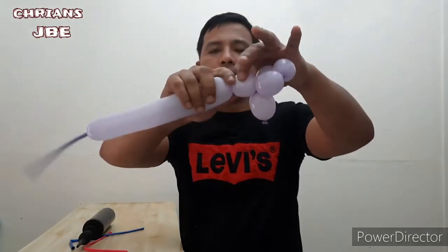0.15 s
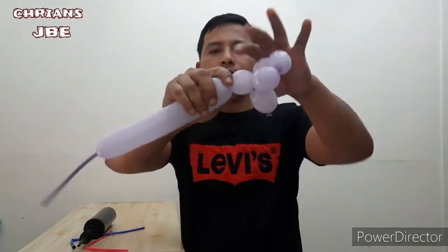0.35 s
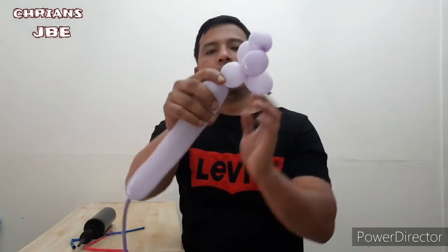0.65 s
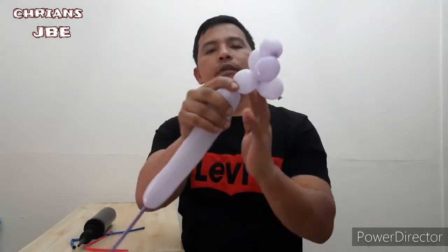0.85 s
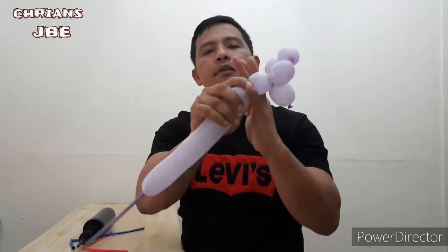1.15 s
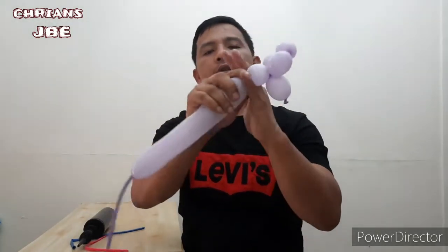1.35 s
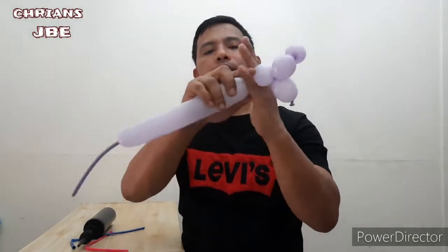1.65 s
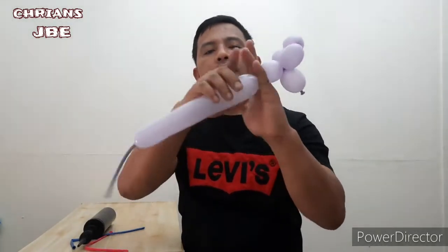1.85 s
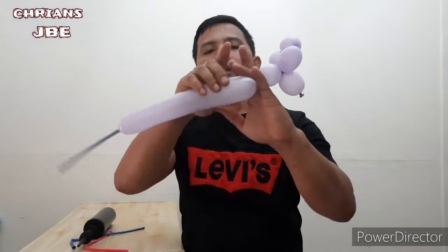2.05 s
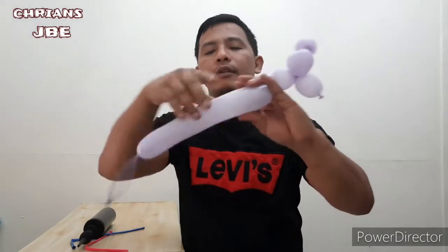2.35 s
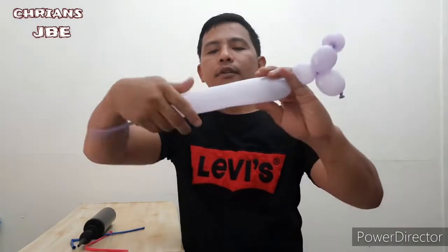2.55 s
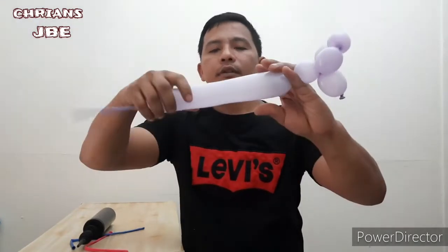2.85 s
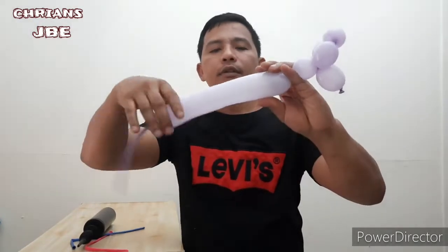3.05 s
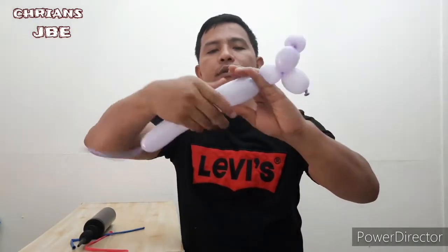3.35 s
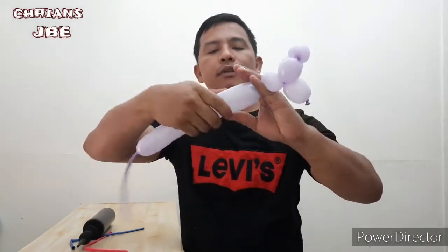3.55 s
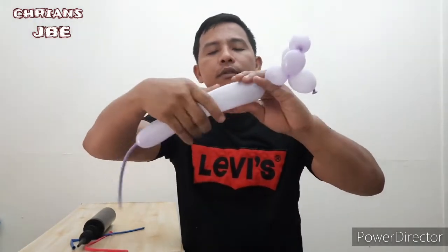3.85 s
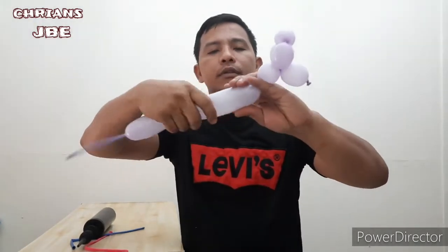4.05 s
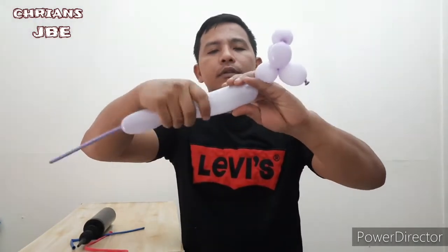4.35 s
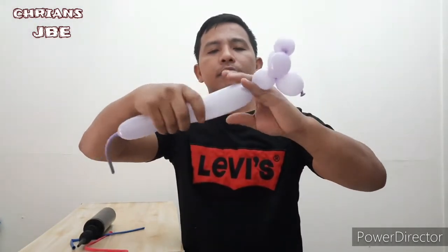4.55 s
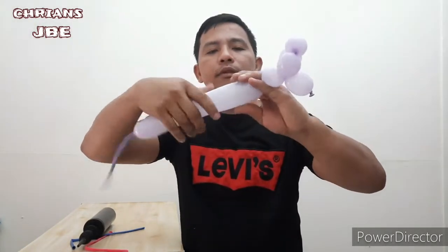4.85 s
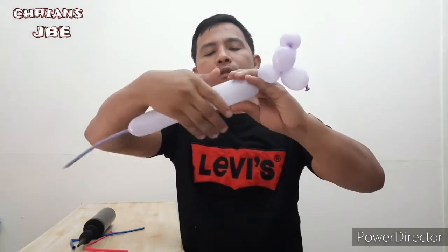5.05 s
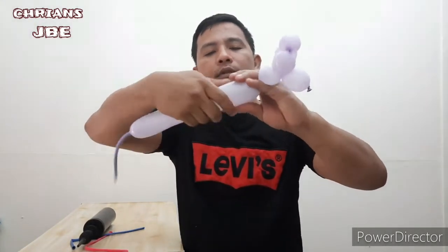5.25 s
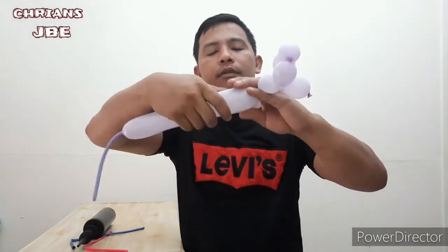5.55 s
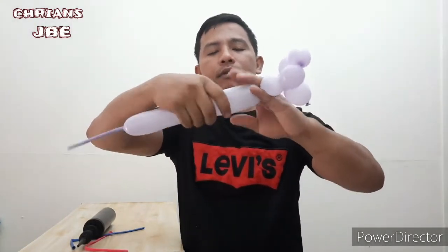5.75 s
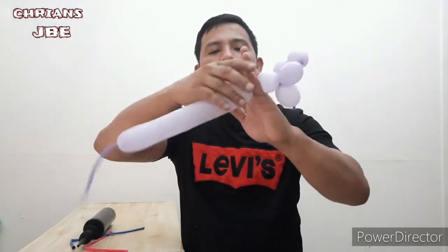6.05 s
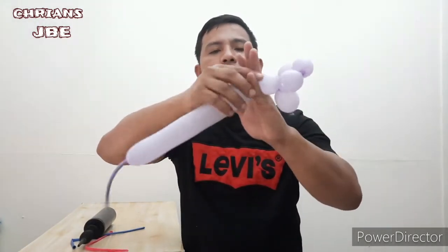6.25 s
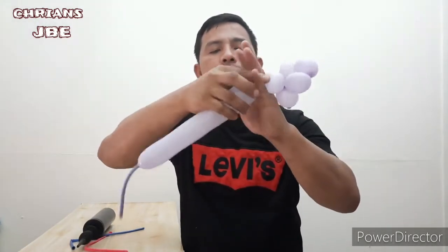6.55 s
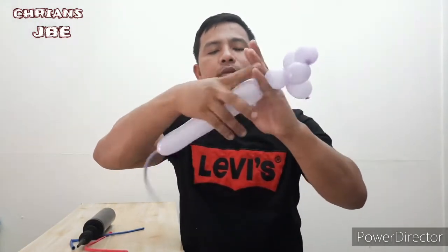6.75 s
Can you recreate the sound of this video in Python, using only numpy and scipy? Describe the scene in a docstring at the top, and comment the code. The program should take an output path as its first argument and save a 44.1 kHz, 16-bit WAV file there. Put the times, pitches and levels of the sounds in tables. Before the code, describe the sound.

A long latex balloon is squeezed and twisted by hand in a small bare room with short, hard echoes, over a constant faint rumble and hiss. A dry snap with a tiny creak comes at 0.1 s and a duller, more distant one at 0.4. After near-quiet, faint rubbing starts about 1.2. From 1.65 to 2.5 the action is dense: hard snaps at 1.7-1.9, rough creaks, a loud croak near 2.36, then a thin high squeak at 2.5. Low, coarse creaks fill 2.8-3.1, weaker ones 3.4-3.6. A firm snap and creak at 3.8 leads to strong short squeaks at 3.9-4.06. Softer creaks run 4.5-4.9; a brief squeak at 5.2 and a sharp pop at 5.34 follow, then creaks 5.6-5.95. Faint slides and a tiny high squeak pass after 6, before a loud snap, creak and squawk at 6.7, fading out.

```python
"""A long latex balloon is squeezed and twisted by two hands in a small bare room.
The latex sticks and slips: lone slips are snaps, uneven trains of slips creak, even ones squeak.
Between them come faint, fast slides. Each grip leaves a different patch of skin free to ring.
Every sound gets its own hard-walled echoes, over a faint steady rumble and hiss."""
import sys
import numpy as np
from scipy import signal
from scipy.fft import rfft, irfft, next_fast_len
from scipy.io import wavfile

SR = 44100
rng = np.random.default_rng(int(sys.argv[2]) if len(sys.argv) > 2 else 0)


def file_out(sig):
    """Save sig as 16-bit WAV at sys.argv[1]."""
    # one column per channel
    cols = np.atleast_2d(sig).T
    # limit, then scale
    lim = np.clip(cols, -1, 1)
    pcm = np.round(lim * 32767).astype(np.int16)
    wavfile.write(sys.argv[1], SR, pcm)


N = 303849  # samples

# In the four event tables, level_db is set before the split into direct sound and echoes.
# Lone releases of the skin, level taken over 10 ms; room_db leans towards the echoes:
# start_s, level_db, low_edge_hz, ring_hz, high_edge_hz, room_db
SNAP_EVENTS = [ (0.1036, -28.5, 1500, 2680, 5600, 6), (.385, -30.5, 700, 2200, 2180, 15.5),
               (1.501, -41.5, 1160, 1860, 2920, 4.5), (1.650, -30, 1110, 1250, 2760, 9),
               (1.7212, -18.5, 656, 2900, 3530, -0.5), (1.761, -16, 590, 850, 3240, 5),
               (1.892, -17.5, 594, 760, 2780, 6.5), (2.1626, -27, 1180, 1790, 3380, 0.5),
               (2.324, -32, 584, 2650, 3700, 8), (2.348, -25, 595, 1750, 3780, 7),
               (2.361, -17.5, 510, 1330, 2250, 5), (3.027, -22.5, 437, 1000, 1990, 9),
               (3.194, -37.5, 635, 2180, 1874, -6.5), (3.3, -49, 570, 760, 2000, 0),
               (3.379, -44, 346, 1990, 3800, 14), (3.795, -36, 546, 1000, 2250, 2),
               (3.832, -23, 1040, 1100, 2700, 5), (4.343, -47, 2080, 3400, 3170, 4.5),
               (4.5217, -28, 477, 804, 2520, -2), (4.761, -35, 354, 1410, 3470, 5),
               (4.848, -27, 258, 970, 3100, 6), (5.152, -45.5, 596, 803, 2330, -10),
               (5.233, -34, 400, 1700, 3000, 4), (5.342, -16.5, 716, 880, 1250, 0),
               (5.6392, -24, 404, 554, 1890, 0), (6.307, -50.5, 400, 1470, 3300, 4),
               (6.676, -22, 615, 774, 3400, 8.5)]
# Firm, uneven drags; crest is the place of greatest force (0-1), slip_rate_hz the nominal starting rate:
# start_s, length_s, crest, slip_rate_hz, level_db, low_edge_hz, ring_hz, high_edge_hz
CREAK_EVENTS = [ (0.111, 0.028, 0, 571, -26, 560, 2370, 3170),
                (1.272, .14, .58, 500.6, -42, 1150, 1490, 1940),
                (1.892, 0.077, 0.4, 265.3, -23.5, 326, 312, 2400),
                (1.962, 0.13, 0.1, 455, -32, 198, 434, 2390),
                (2.061, 0.038, 0.27, 519, -26.5, 248, 2040, 3740),
                (2.178, 0.009, 0, 565, -21.5, 358, 1980, 3640),
                (2.355, .052, 0.46, 304.6, -14, 290, 1370, 3000),
                (2.47, 0.057, 0.05, 609, -28.5, 246, 1960, 3350),
                (2.788, 0.081, 0.5, 185.9, -27.5, 270, 705, 2480),
                (2.842, 0.085, 0.32, 213.6, -25.5, 400, 800, 2830),
                (2.935, 0.16, 0, 784, -34.5, 295, 730, 2640),
                (3.032, 0.06, 0.38, 152.5, -20, 268, 820, 2980),
                (3.373, 0.059, 0.17, 404, -43.5, 330, 467, 2700),
                (3.452, 0.087, 0, 207.8, -33.5, 353, 503, 2130),
                (3.539, 0.066, 0.1, 501.6, -37, 454, 477, 1830),
                (3.832, 0.066, 0.36, 364.3, -22, 298, 910, 2540),
                (3.953, .044, 0.3, 286.8, -17, 242, 270, 2650),
                (4.512, 0.046, 1, 454.6, -30, 380, 458, 2570),
                (4.574, 0.058, 0.56, 414, -38.5, 216, 373, 2320),
                (4.672, 0.093, 1, 383, -44.5, 295, 368, 2070),
                (4.762, 0.055, 0.56, 271, -40.5, 200, 253, 3440),
                (4.845, 0.097, 0, 261.5, -28.5, 238, 830, 3560), (5.15, .1, 0.54, 265, -31, 226, 256, 2060),
                (5.599, 0.066, 0.3, 286, -30.5, 274, 1980, 1550),
                (5.74, 0.15, 0.17, 360.3, -30, 340, 714, 2160),
                (5.897, 0.068, 0.63, 291.7, -32, 232, 925, 4440),
                (6.677, 0.05, 0.9, 380.7, -17.5, 346, 463, 2830),
                (6.795, 0.086, 0.65, 343, -39, 260, 1400, 1930)]
# Light touches that ring the skin at the nominal slip rate:
# start_s, length_s, slip_rate_hz, level_db, high_edge_hz
SLIDE_EVENTS = [ (1.185, 0.13, 1244, -54.5, 6130), (1.509, 0.4, 1690, -53, 3800),
                (2.745, 0.11, 524, -45, 2920), (3.759, 0.07, 977, -50, 2960),
                (4.226, 0.089, 862.5, -46.5, 1190), (5.419, 0.048, 812, -42.5, 2310),
                (6.04, .2, 1010, -61, 6000), (6.307, 0.22, 849, -62, 3470),
                (6.458, 0.14, 1135, -55.5, 2880), (6.618, 0.025, 1127, -38.5, 1720)]
# Even, gliding slips, pitches before the arch and scatter:
# start_s, length_s, crest (0-1), start_pitch_hz, end_pitch_hz, level_db, ring_hz, high_edge_hz
SQUEAK_EVENTS = [ (2.391, 0.05, 0.26, 364, 336.6, -21, 2400, 3700),
                 (2.465, 0.013, 0.76, 1714, 1800, -17.5, 1870, 3270),
                 (2.491, 0.026, 0, 1643, 1736, -18, 1770, 4900),
                 (2.514, .038, .4, 1722, 1675, -44, 3400, 4330),
                 (2.791, 0.029, 0.2, 177.3, 165, -30.5, 194, 604),
                 (3.905, .051, 0.88, 392, 377.3, -16, 2090, 2370),
                 (4.057, 0.0126, 0, 387, 373, -14, 750, 1040),
                 (5.023, .16, 0.07, 241.7, 254, -56, 247, 490),
                 (5.233, 0.016, 0, 375.4, 377, -22.5, 1760, 2000),
                 (6.161, 0.0514, 0.07, 1485, 1590, -53.5, 1560, 3330),
                 (6.729, 0.043, 0.01, 334, 334.5, -18, 1050, 3700)]
# Resonances of the air-filled tube: centre_hz, width_hz, added gain (ratio)
TUBE_RESONANCES = [(229, 110, 0.9), (820, 120, 0.36)]
# Decay of the room's tail: frequency_hz, t60_s
ROOM_DECAY = [(200, 0.43), (530, 0.31), (1400, 0.31), (3700, 0.32), (10000, 0.32)]
# Spectral shape of the background, before its overall level is set: frequency_hz, relative density_db
BACKGROUND_SHAPE = [(25, -25), (60, -13), (100, -9), (135, -23.5), (210, -6.5), (330, -15), (450, -24),
                    (1500, -33.5), (4000, -44), (8200, -41.5), (9500, -49.5), (15500, -47.5)]
# Microphone colour on the balloon sounds: frequency_hz, gain_db
MIC_COLOUR = [(200, 3.5), (4000, 3.5), (6300, -1.5), (8200, 3.5), (9300, -8), (14000, -9), (16000, -24.5)]
# Stereo balance: frequency_hz, left_minus_right_db
STEREO_BALANCE = [(100, 7), (300, 3), (1500, 4), (4500, 4), (8200, 9.5), (9800, -4.5), (13000, -0.5)]

BACKGROUND_DB = -64  # before the stereo balance
TOP_HZ = 15900  # top of the passband
BINS = np.maximum(np.fft.rfftfreq(4096, 1 / SR), 1)  # Hz
# Every patch of skin: the higher its high edge, the more hiss lies above it
HISS_DB, HISS_AT_HZ, HISS_DB_PER_OCTAVE = -12, 2553, 16.5
# Reference slip rate for roughness in creaks and squeaks
ROUGH_AT_HZ = 334
# Creaks: the rate sags by this share; faster slips and brighter patches are less even
CREAK_SAG, CREAK_ROUGH, RATE_POWER, BRIGHT_POWER = 0.06, 0.26, 0.3, 0.6
# Slides: uneven slips, force crest (0-1), low edge as a share of the slip rate
SLIDE_ROUGH, SLIDE_CREST, SLIDE_LOW_SHARE = 0.26, 0.54, 0.85
# Squeaks: almost even slips; the skin sounds from just under the starting pitch upwards
SQUEAK_ROUGH, PITCH_POWER, SQUEAK_LOW_SHARE = 0.016, 0.7, 0.98


def undb(db):
    """Decibels to gain."""
    return 10 ** (np.asarray(db) / 20)


def curve(points, hz):
    """Read (Hz, value) points on a log-frequency axis."""
    f, value = np.transpose(points)
    return np.interp(np.log(np.maximum(hz, 1)), np.log(f), value)


def colour(x, gain):
    """Filter by a gain that is a function of frequency."""
    length = x.shape[-1]
    size = next_fast_len(length)
    spectrum = rfft(x, size) * gain(np.fft.rfftfreq(size, 1 / SR))
    return irfft(spectrum, size)[..., :length]


def causal(gain):
    """Minimum-phase impulse response of a gain given on BINS."""
    cepstrum = irfft(np.log(gain + 1e-6))
    half = len(cepstrum) // 2
    # fold the cepstrum forward in time, so the energy comes as early as it can
    cepstrum[1:half] *= 2
    cepstrum[half + 1:] = 0
    return irfft(np.exp(rfft(cepstrum)))[:half]


def unit(x):
    """Scale to a mean energy of one per channel."""
    return x / np.sqrt(np.mean(np.sum(x ** 2, axis=-1)))


def diffuse(size, apart_hz):
    """Noise at two close microphones: alike in the bass, unrelated in the treble."""
    def alike(f):
        return 0.95 / (1 + (f / apart_hz) ** 2)

    mid, side = rng.standard_normal((2, size))
    mid = colour(mid, lambda f: np.sqrt(1 + alike(f)))
    side = colour(side, lambda f: np.sqrt(1 - alike(f)))
    return np.array([mid + side, mid - side])


def add(track, s, sound):
    """Mix a stereo sound in at time s."""
    i = max(int(s * SR), 0)
    track[:, i:i + sound.shape[1]] += sound[:, :max(N - i, 0)]


def background(apart_hz=110):
    """Faint steady rumble and hiss of the room, as shaped noise."""
    noise = colour(diffuse(N, apart_hz), lambda f: undb(curve(BACKGROUND_SHAPE, f)))
    return undb(BACKGROUND_DB) * noise / noise.std()


def grip(low_hz, ring_hz, high_hz):
    """The patch of skin that a grip leaves free: a taut, bright patch also hisses more."""
    hiss_db = HISS_DB + HISS_DB_PER_OCTAVE * np.log2(high_hz / HISS_AT_HZ)
    return low_hz, ring_hz, high_hz, hiss_db


def skin(low_hz, ring_hz, high_hz, hiss_db, ring_gain=1.11, ring_q=9.7, bump_db=-40.5):
    """Response of the free latex: a band with one resonance, hiss above it, a dull bump below."""
    low_cut = 1 / (1 + (low_hz / BINS) ** 6)
    high_cut = 1 / (1 + (BINS / high_hz) ** 6)
    bump = undb(bump_db + curve([(30, -16.5), (110, 8.5), (400, -6.5)], BINS))
    band = np.sqrt((low_cut + bump ** 2) * (high_cut + undb(hiss_db) ** 2))
    ring = 1 + ring_gain / (1 + (ring_q * np.log(BINS / ring_hz)) ** 2)
    tube = 1 + sum(gain / (1 + (2 * (BINS - hz) / width) ** 2) for hz, width, gain in TUBE_RESONANCES)
    return causal(band * ring * tube * undb(curve(MIC_COLOUR, BINS)))


def snaps():
    """Single releases of the stretched skin; those facing away reach the walls more than the microphone."""
    for s, db, *patch, room_db in SNAP_EVENTS:
        ringing = unit(skin(*grip(*patch)))
        yield s, undb(db) * np.sqrt(SR / 100) * ringing, room_db  # energy spread over 10 ms


def slips(length, start_hz, end_hz, rough, arch=0.045, jitter=0.55, scatter_db=26.5, rasp=0.3):
    """Stick-slip pulses; the rate arches with finger speed, roughness scatters their spacing and size."""
    timing, strength = rng.standard_normal((2, 512))
    noise = rng.standard_normal(SR // 2)
    u = np.linspace(0, 1, int(length * SR))
    hz = (start_hz + (end_hz - start_hz) * u) * (1 + arch * np.sin(np.pi * u))
    cycles = np.cumsum(hz) / SR
    holds = np.exp(jitter * rough * timing)
    release = np.cumsum(holds) - holds[0]
    release = release[release < cycles[-1]]
    size = undb(scatter_db * rough * strength[:len(release)].clip(-2, 2))
    # place the pulses on a finer time grid, then bring them down to SR
    fine = 4
    place = np.interp(release, cycles, np.arange(len(u)) * fine).astype(int)
    impulses = np.bincount(place, size, len(u) * fine)
    pulses = fine * signal.resample_poly(impulses, 1, fine)
    # the sliding skin rasps for a moment (5 ms decay) after each release
    sliding = signal.lfilter([1], [1, -np.exp(-1 / (0.005 * SR))], pulses)
    return unit(pulses) + rasp * np.sqrt(rough) * unit(sliding * noise[:len(u)])


def disperse(x, spread_s=0.00309, knee_hz=2500):
    """Ripples cross the skin faster in the treble, which smears each pulse."""
    return colour(x, lambda f: np.exp(-2j * np.pi * spread_s * knee_hz * np.log1p(f / knee_hz)))


def stroke(train, crest, db, patch, touch_force=0.31, grip_force=0.72, last_force=0.28,
           flex_db=-31.0, flex_hz=125):
    """A finger takes hold, presses and eases off; slips sound the skin while the tube flexes."""
    force = np.interp(np.linspace(0, 1, len(train)), [0, crest / 4, crest, 1],
                      [touch_force, grip_force, 1, last_force])
    sound = unit(disperse(signal.fftconvolve(train * force, skin(*patch))))
    # the flexing tube is low noise that follows the force
    push = rng.standard_normal(SR // 2)[:len(force)] * force
    push = np.pad(push, (0, len(sound) - len(force)))
    flex_band = signal.butter(2, [flex_hz / 2, flex_hz * 2], "bandpass", fs=SR)
    flex = signal.lfilter(*flex_band, push)
    return undb(db) * np.linalg.norm(force) * (sound + undb(flex_db) * unit(flex))


def creaks(room_db=1.5):
    """A firm finger drags in slips, least even when fast and on a taut, bright patch."""
    for s, length, crest, hz, db, low_hz, ring_hz, high_hz in CREAK_EVENTS:
        fast = (hz / ROUGH_AT_HZ) ** RATE_POWER
        bright = (high_hz / HISS_AT_HZ) ** BRIGHT_POWER
        train = slips(length, hz, hz * (1 - CREAK_SAG), CREAK_ROUGH * fast * bright)
        yield s, stroke(train, crest, db, grip(low_hz, ring_hz, high_hz)), room_db


def slides(room_db=12.5):
    """The fingers slide lightly to a new hold, in faint, fast slips."""
    for s, length, hz, db, high_hz in SLIDE_EVENTS:
        train = slips(length, hz, hz, SLIDE_ROUGH)
        patch = grip(SLIDE_LOW_SHARE * hz, hz, high_hz)
        yield s, stroke(train, SLIDE_CREST, db, patch), room_db


def squeaks(room_db=1.0):
    """Under a tight grip slips lock into an even, gliding pitch, less steady when high; little tube flex."""
    for s, length, crest, start_hz, end_hz, db, ring_hz, high_hz in SQUEAK_EVENTS:
        rough = SQUEAK_ROUGH * (start_hz / ROUGH_AT_HZ) ** PITCH_POWER
        train = slips(length, start_hz, end_hz, rough)
        patch = grip(SQUEAK_LOW_SHARE * start_hz, ring_hz, high_hz)
        yield s, stroke(train, crest, db, patch, flex_db=-36.0), room_db


def room_decay():
    """Band filters and fading envelopes of the room's tail."""
    t = np.arange(20480) / SR
    bins = np.fft.rfftfreq(len(t), 1 / SR)
    hz, t60 = np.transpose(ROOM_DECAY)
    # overlapping bands, each peaking at one table frequency
    bands = np.array([curve(np.column_stack([hz, share]), bins) for share in np.eye(len(hz))])
    fades = np.exp(-np.log(1000) * t / t60[:, None]) / np.sqrt(t60[:, None])
    return t, bands, fades


def room(t, bands, fades, wall_s=0.0056, wall_gain=1.9, wall_fade_s=0.00059, early_db=-0.5, apart_hz=850):
    """Echoes for one balloon position: a dense fading tail with a burst as the nearest wall answers."""
    echoes = irfft(rfft(diffuse(len(t), apart_hz))[:, None] * bands)
    tail = np.sum(echoes * fades, axis=1)
    wall = 1 + wall_gain * np.exp(-np.abs(t - wall_s) / wall_fade_s)
    build_up = np.where(t < wall_s, undb(early_db), wall)
    return unit(tail * build_up * (t > 0.0007))


def scene(direct_db=-2.5, walls_db=-0.5):
    """The balloon keeps moving, so every sound gets its own echoes over the background."""
    out, decay = background(), room_decay()
    for s, sound, room_db in [*snaps(), *creaks(), *slides(), *squeaks()]:
        direct = np.array([sound, np.roll(sound, 2)])  # right hears it two samples later
        walls = signal.fftconvolve(sound[None], room(*decay), axes=1)
        add(out, s, undb(direct_db - room_db / 2) * direct)
        add(out, s, undb(walls_db + room_db / 2) * walls)
    return out


def record(dry):
    """The left channel is louder over most of the range; peaks clip at full scale, then the top is cut."""
    tilted = colour(dry, lambda f: undb(np.outer([1, -1], curve(STEREO_BALANCE, f)) / 2))
    top_cut = signal.ellip(8, 0.2, 70, TOP_HZ, fs=SR, output="sos")
    return signal.sosfilt(top_cut, tilted.clip(-1, 1))


dry = scene()
out = record(dry)
file_out(out)
```